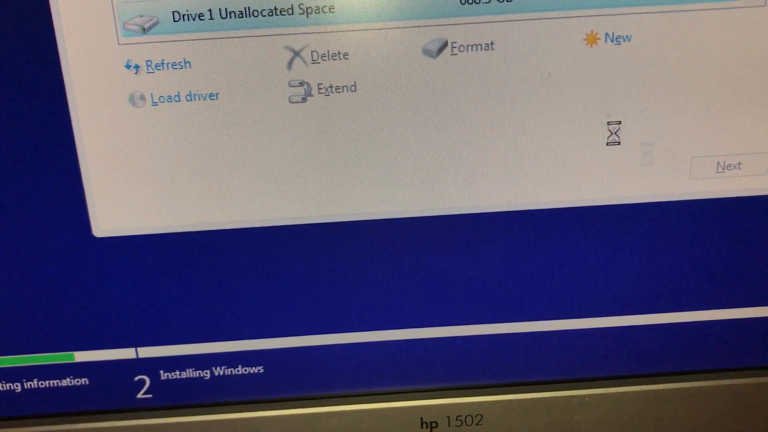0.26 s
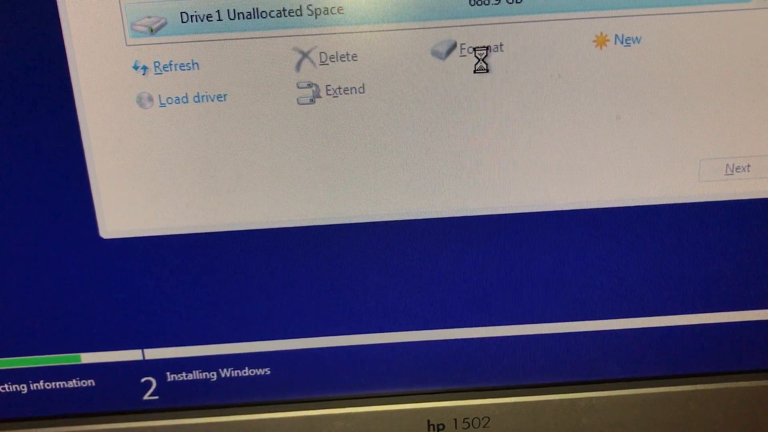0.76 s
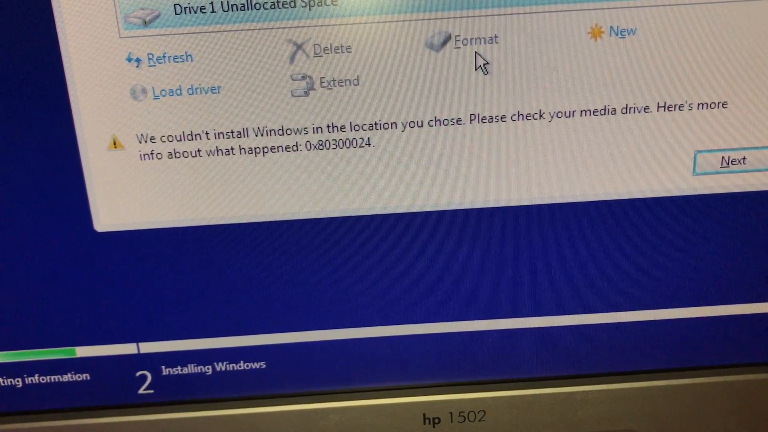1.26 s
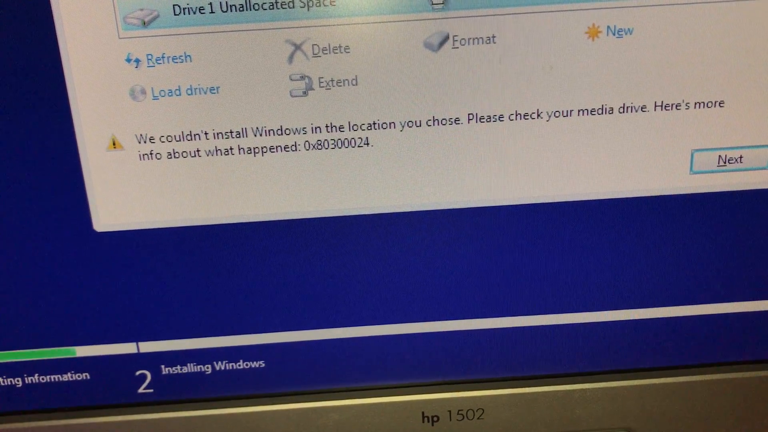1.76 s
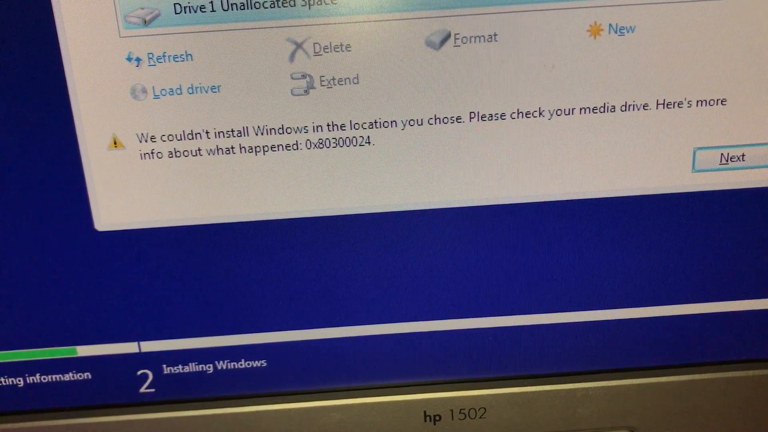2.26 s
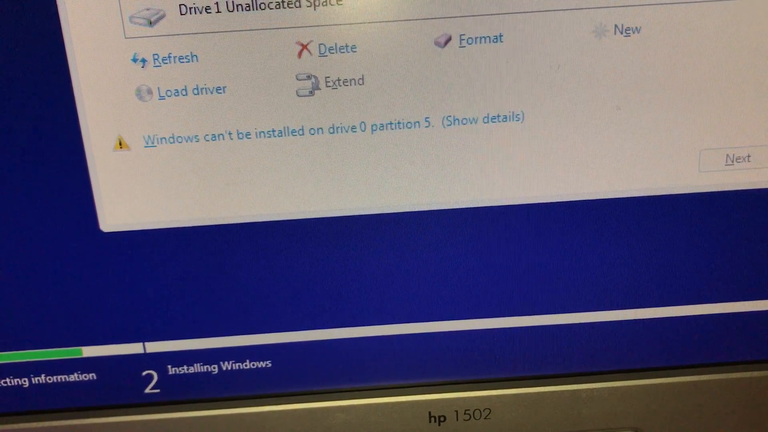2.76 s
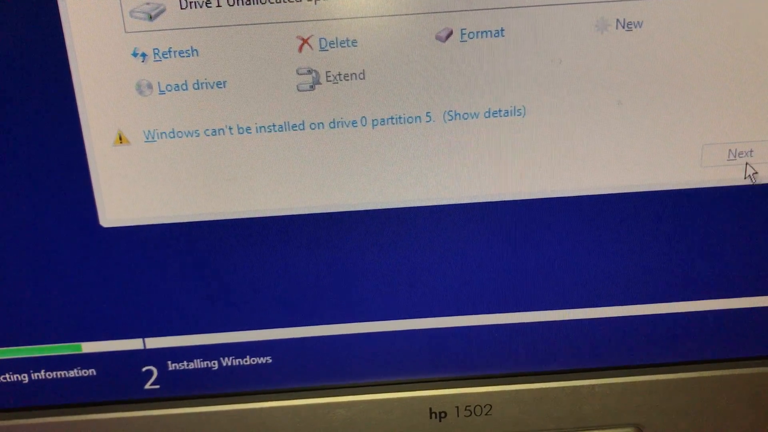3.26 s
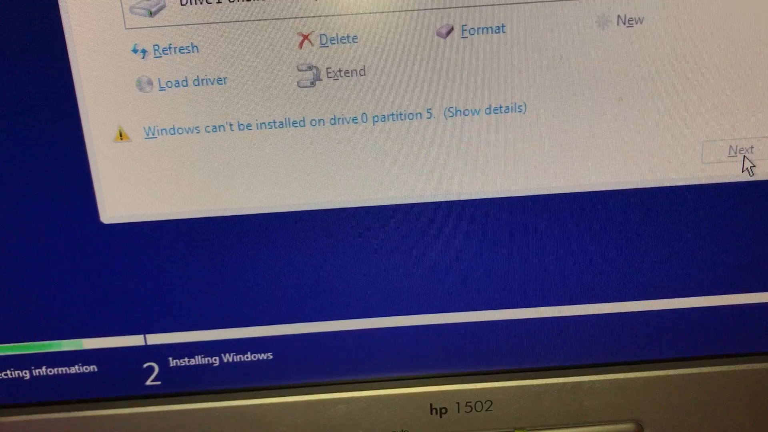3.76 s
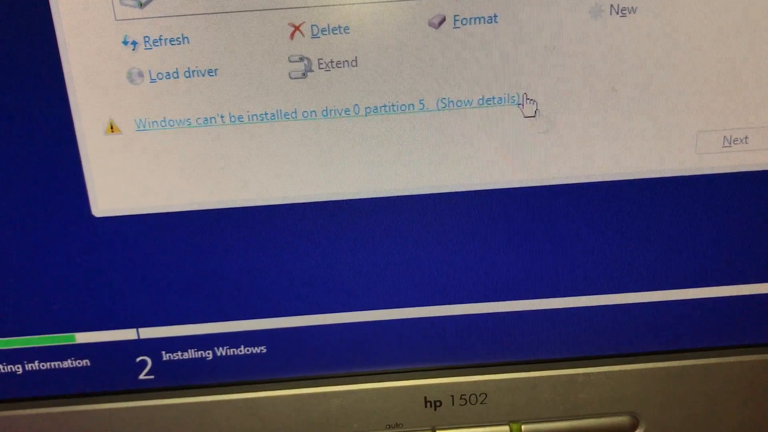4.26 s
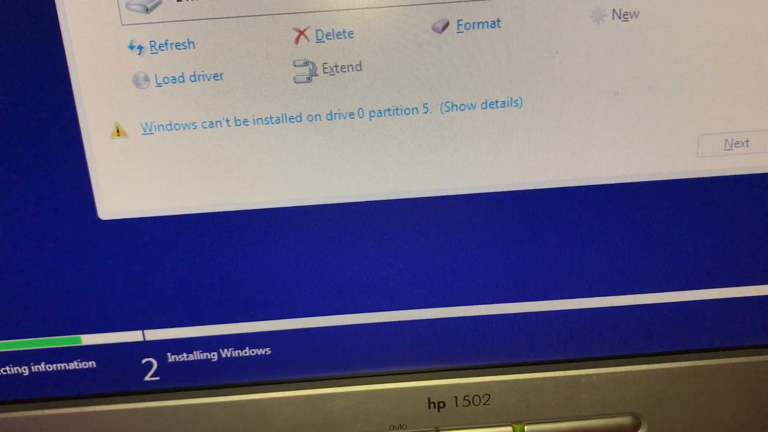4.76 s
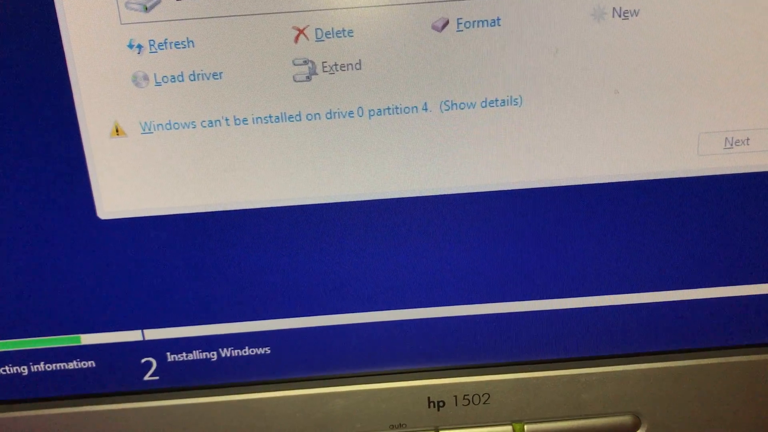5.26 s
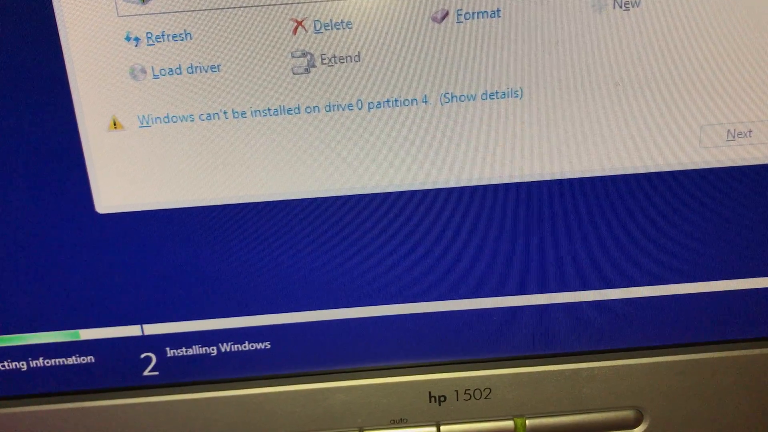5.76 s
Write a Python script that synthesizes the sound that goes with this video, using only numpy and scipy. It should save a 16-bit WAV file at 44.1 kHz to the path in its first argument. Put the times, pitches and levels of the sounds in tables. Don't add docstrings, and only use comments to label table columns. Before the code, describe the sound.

Even, low fan noise fills the whole stretch, slowly pulsing in its bass, with thin air hiss above. Bright, dry mouse clicks stand out sharply in the second half: three press-and-release pairs and one last press at the very end. Echoes are tiny and short, as in a small room. One barely audible scuff and faint creaks come from the hand; the mono handheld microphone adds subtle electronic ticking.

```python
import sys
import numpy as np
from scipy import signal
from scipy.fft import rfft, irfft, next_fast_len
from scipy.io import wavfile
from scipy.ndimage import map_coordinates

SR = 44100
rng = np.random.default_rng(int(sys.argv[2]) if len(sys.argv) > 2 else 0)


def store_pcm(level_fs):
    pcm = np.round(np.clip(level_fs, -1, 1) * 32767).astype(np.int16)
    wavfile.write(sys.argv[1], SR, np.atleast_2d(pcm).T)


def magnitude_from_level(level_db):
    exponent = np.asarray(level_db, float) / 20
    return 10 ** exponent


N = 265482

# freq_hz, density_db
RUMBLE_SPECTRUM = [(13, -50), (22, -7), (37, -4.5), (54, 7.5), (70, 9), (113, 0), (135, -21), (180, -42),
                   (300, -120)]
# freq_hz, density_db
DRONE_SPECTRUM = [(85, -41), (145, -6), (161, -6.5), (193, 0.5), (216, 6), (237, -1), (306, -12.5),
                  (360, -14), (400, -26), (520, -66), (880, -120)]
# freq_hz, density_db
RUSH_SPECTRUM = [(220, -38), (380, -3), (394, -14.5), (413, -4.5), (444, -7), (486, -2.5), (565, -9),
                 (669, 0.5), (759, -11.5), (931, -9.5), (971, -10.5), (1040, -10.5), (1080, -12.5),
                 (1210, -8), (1600, -18), (2080, -31.5), (3520, -120)]
# freq_hz, density_db
FIZZ_SPECTRUM = [(880, -30), (1500, -2), (1760, -2.5), (2190, 0.5), (2500, -2.5), (3090, -6), (4600, -10),
                 (4900, -13.5), (7500, -18), (9650, -20), (10400, -25), (11500, -22), (13100, -24.5),
                 (16000, -28)]
# freq_hz, level_db (rms)
ROTOR_TONES = [(138.9, -54), (460.9, -75), (905.7, -82), (1055.8, -82), (1301.4, -85), (2217.9, -88)]
# freq_hz,
# width_hz, level_db
STANDING_WAVES = [(26, 8, -11), (39, 4, 3), (54, 4, -4), (87, 5, -4), (128, 5, -5), (181, 9, 4),
                  (194, 4, -2), (206, 5, 2), (217, 5, -3), (251, 6, -3), (281, 9, 3), (360, 9, 2),
                  (490, 5, -6), (540, 12, 2), (605, 10, -3), (748, 10, -3), (768, 8, 3), (830, 8, -3),
                  (880, 18, -3), (995, 14, -4), (1032, 12, 3), (1115, 8, -3), (1235, 25, 3), (1280, 18, -5),
                  (1370, 30, 2), (1680, 20, 3), (1820, 15, -3), (1860, 20, 3), (1950, 20, -3),
                  (2150, 35, 2), ]
# multiple (of 120 Hz), level_db (rms)
MAINS_HARMONICS = [(2, -58), (3, -73), (4, -72), (6, -75), (7, -83), (8, -84), (9, -81)]
# freq_hz, density_db
COIL_SPECTRUM = [(11200, -40), (11650, -9), (11820, 0), (12000, -7), (12500, -40)]
# time_s, peak_db, shell_db, leaf_hz
PRESS_SNAPS = [
    (2.5928, -33.5, -5.5, 8300),
    (3.6519, -37, -3, 8150),
    (4.898, -32, -8.5, 8230),
    (5.937, -34.5, -7, 8180),
]
# time_s, peak_db, shell_db, leaf_hz
RELEASE_SNAPS = [
    (2.6837, -34.5, -0.5, 8320),
    (3.7346, -35, 0, 8040),
    (5.0133, -32.5, -4.5, 8230),
]
# freq_hz, width_hz, level_db
PRESS_MODES = [(2970, 250, -11), (3650, 190, -30), (4550, 230, -17.5), (5430, 290, -5), (6360, 240, -6),
               (7030, 330, -8), (8290, 330, -2), (9900, 210, -13), (11260, 250, -10.5), (12700, 220, -21),
               (13100, 440, -24), (14200, 350, -9), (14800, 300, -16)]
# freq_hz, width_hz, level_db
RELEASE_MODES = [(1590, 600, -13.5), (2800, 1400, -10.5), (3720, 130, -19), (4480, 170, -14.5),
                 (5420, 210, -11.5), (6280, 550, -17), (8230, 720, -1), (9210, 380, -9.5), (9760, 300, -9),
                 (11130, 550, -7), (12400, 230, -24), (13000, 270, -25), (14000, 290, -15),
                 (14850, 390, -10), (16300, 500, -30)]
# freq_hz, density_db
CRACK_SPECTRUM = [(1200, -30), (1800, -8), (3200, -5), (5000, -7), (8500, 0), (10300, -12), (12000, -3),
                  (15200, -4), (15750, -16), (15950, -60)]
# freq_hz, t60_s
ROOM_DECAY = [(2000, 0.062), (8000, 0.076), (15000, 0.056)]
# freq_hz, gain_db
ECHO_SPECTRUM = [(2000, 2), (7000, 1), (8250, -5), (9200, -1), (10400, 3), (11300, -3), (12600, 1),
                 (14500, -6), (15700, -2), (15950, -50)]
# time_s, peak_db
CREAKS = [
    (3.8731, -67),
    (5.8814, -70),
]
# freq_hz, density_db
CREAK_SPECTRUM = [(8000, -20), (12000, 0), (15600, -2), (15900, -40)]
# freq_hz, density_db
SCUFF_SPECTRUM = [(8000, -18), (9300, -6), (9700, 0), (10200, -8), (12000, -16), (14000, -40)]
# start_s, length_s
BUSY_SPELLS = [
    (4.896, .52),
    (5.934, .52),
]
# freq_hz, density_db
BUSY_SPECTRUM = [(4700, -30), (5200, 0), (7000, -1), (8500, -2), (9800, -2), (10400, -6), (11200, -3),
                 (15800, -5), (15950, -60)]
# freq_hz, gain_db
BEACON_SPECTRUM = [(5000, -25), (9500, -5), (11200, 4), (13000, 8), (15800, 9), (15950, -40)]

RUMBLE_DB, DRONE_DB, RUSH_DB, FIZZ_DB = -46.5, -46.5, -55.5, -62
SLOW_HZ, SLOW_DB = 53.72, -54
BEAT_PERIOD_S, IN_STEP_S, NEIGHBOUR_RATIO = 3.55, 1.66, 0.76
TOP_HZ = 15930
LEAF_T60_S, LEAF_DB = 0.2, -32
SCUFF_S, SCUFF_DB = 4.403, -69
BEACON_INTERVAL_S, FIRST_BEACON_S = 0.1024, 0.02505
DOZE_COUNT, PACKET_SAMPLES = 37, 42
BUSY_DB, SURGE_DB, SURGE_S, FADE_DB_PER_S = -70, 4, 0.03, 900


def fans():
    rumble = magnitude_from_level(RUMBLE_DB + 0.6 * wobble(0.63)) * noise(RUMBLE_SPECTRUM)
    drone = magnitude_from_level(DRONE_DB + 0.35 * wobble(3.43)) * noise(DRONE_SPECTRUM)
    rush = magnitude_from_level(RUSH_DB + 0.12 * wobble(3.24)) * noise(RUSH_SPECTRUM)
    fizz = magnitude_from_level(FIZZ_DB + 0.18 * wobble(2.67)) * noise(FIZZ_SPECTRUM)
    air = standing(rumble + drone + rush + fizz, ripple_db=1.3)
    turns = (np.arange(N) / SR - IN_STEP_S) / BEAT_PERIOD_S
    beat = abs(1 + NEIGHBOUR_RATIO * np.exp(2j * np.pi * turns))
    slow = beat * tones([(SLOW_HZ, SLOW_DB)], sway_db=3.0, drift_rad=0.9)
    return air + tones(ROTOR_TONES, sway_db=1.0, drift_rad=0.55) + slow


def standing(x, ripple_db):
    size = next_fast_len(N + 8192)
    hz = np.fft.rfftfreq(size, 1 / SR)
    gain_db = sum(level_db * np.exp(-((hz - centre_hz) / width_hz) ** 2)
                  for centre_hz, width_hz, level_db in STANDING_WAVES)
    dense = map_coordinates(rng.standard_normal(1000), [hz / 30])
    gain_db = gain_db + ripple_db * dense * (hz > 2400)
    return irfft(rfft(x, size) * magnitude_from_level(gain_db) * (hz < TOP_HZ), size)[:N]


def supply():
    lines = [(120 * multiple, level_db) for multiple, level_db in MAINS_HARMONICS]
    buzz = tones(lines, sway_db=0.6, drift_rad=0.2)
    return buzz + magnitude_from_level(-90 + 3 * wobble(14)) * noise(COIL_SPECTRUM)


def mouse():
    down = snaps(PRESS_SNAPS, PRESS_MODES, pace=1.05, treble_db=-3.5, crack_db=-4)
    up = snaps(RELEASE_SNAPS, RELEASE_MODES, pace=0.88, treble_db=-0.7, crack_db=-7)
    echoes = magnitude_from_level(-15.5) * room(down) + magnitude_from_level(-18.5) * room(up)
    return down + up + coloured(echoes, ECHO_SPECTRUM)


def snaps(events, modes, pace, treble_db, crack_db):
    ringing, chatter = np.zeros(N + SR), np.zeros(N + SR)
    t = np.arange(SR // 4) / SR
    hz, width_hz, level_db = np.transpose(modes)
    is_shell = hz < 7500
    is_leaf = abs(hz - 8250) < 200
    speed = pace * (np.where(is_shell, 420, 520) + 0.5 * width_hz)
    for time_s, peak_db, shell_db, leaf_hz in events:
        level_luck, pitch_luck = rng.standard_normal((2, len(hz)))
        tilt_db = treble_db * (hz > 9000) + shell_db * is_shell
        pitch_hz = np.where(is_leaf, leaf_hz, hz * (1 + 0.004 * pitch_luck))
        phase = 2 * np.pi * pitch_hz[:, None] * t + 9 * level_luck[:, None]
        rings = swell(t * speed[:, None]) * np.sin(phase)
        body = magnitude_from_level(level_db + tilt_db + 0.8 * level_luck) @ rings
        shake = 0.07 * np.cumsum(rng.standard_normal(len(t)))
        leaf = magnitude_from_level(LEAF_DB - 60 * t / LEAF_T60_S) * np.sin(2 * np.pi * leaf_hz * t + shake)
        start = round((time_s - 0.0008) * SR)
        span = slice(start, start + len(t))
        ringing[span] += magnitude_from_level(peak_db - 1.2) * (body + leaf)
        chatter[span] += magnitude_from_level(peak_db + shell_db + crack_db) * swell(t * 620 * pace)
    return ringing[:N] + chatter[:N] * noise(CRACK_SPECTRUM)


def swell(u):
    return u ** 3 * np.exp(3 - 3 * u)


def room(x):
    hz, t, bins = signal.stft(rng.standard_normal(SR // 4), SR, nperseg=256)
    decay = magnitude_from_level(-60 * t / along(ROOM_DECAY, hz)[:, None])
    tail = signal.istft(bins * decay, SR, nperseg=256)[1]
    delayed = np.pad(x, (130, 0))
    return signal.fftconvolve(delayed, tail / np.linalg.norm(tail))[:N]


def hand():
    times_s, peaks_db = np.transpose(CREAKS)
    creaks = magnitude_from_level(-3) * ticks(times_s, peaks_db, 0.003, CREAK_SPECTRUM)
    return creaks + ticks([SCUFF_S], SCUFF_DB, 0.012, SCUFF_SPECTRUM)


def ticks(times_s, level_db, length_s, spectrum):
    gate = np.zeros(N)
    gate[np.round(np.asarray(times_s) * SR).astype(int)] = magnitude_from_level(level_db)
    shape = np.hanning(max(round(length_s * SR), 4))
    return np.convolve(gate, shape)[:N] * noise(spectrum)


def electronics():
    k = np.arange(int((N / SR - FIRST_BEACON_S) / BEACON_INTERVAL_S) + 1)
    k = k[(k < DOZE_COUNT) | (k % 3 == 2)]
    awake = k < DOZE_COUNT
    ends = np.round((FIRST_BEACON_S + k * BEACON_INTERVAL_S) * SR).astype(int)
    spikes = np.zeros(N)
    spikes[ends] = magnitude_from_level(np.where(awake, -59.5, -56.5) + 0.8 * rng.standard_normal(len(k)))
    spikes[ends - PACKET_SAMPLES] = -spikes[ends] * magnitude_from_level(np.where(awake, -5, 0))
    return coloured(spikes, BEACON_SPECTRUM) + busy() * noise(BUSY_SPECTRUM)


def busy():
    t = np.arange(N) / SR
    gain = np.zeros(N)
    for start_s, length_s in BUSY_SPELLS:
        surge_db = SURGE_DB * np.exp(-abs(t - start_s) / SURGE_S)
        fade_db = FADE_DB_PER_S * np.clip(t - start_s - length_s, 0, None)
        gain += (t > start_s) * magnitude_from_level(BUSY_DB + surge_db - fade_db)
    return gain


def tones(lines, sway_db, drift_rad):
    t = np.arange(N) / SR
    out = np.zeros(N)
    for hz, level_db in lines:
        level = np.sqrt(2) * magnitude_from_level(level_db + sway_db * wobble(2.225))
        phase = drift_rad * wobble(1.413) + rng.uniform(0, 2 * np.pi)
        out += level * np.sin(2 * np.pi * hz * t + phase)
    return out


def noise(spectrum):
    return unit(coloured(rng.standard_normal(N), spectrum))


def coloured(x, spectrum):
    size = next_fast_len(N + 8192)
    gain = magnitude_from_level(along(spectrum, np.fft.rfftfreq(size, 1 / SR)))
    return irfft(rfft(x, size) * gain, size)[:N]


def along(points, hz):
    f, v = np.transpose(points)
    return np.interp(np.log(hz + 1), np.log(f + 1), v)


def wobble(rate_hz):
    return map_coordinates(rng.standard_normal(400), [np.arange(N) * rate_hz / SR])


def unit(x):
    return x / np.sqrt(np.mean(x ** 2) + 1e-20)


def scene():
    return (fans() + supply() + mouse() + hand())[None]


def roll_off(x):
    return signal.sosfilt(signal.butter(12, 16600, fs=SR, output="sos"), x)


def record(dry):
    return roll_off(dry + electronics())


dry = scene()
out = record(dry)
store_pcm(out)
```